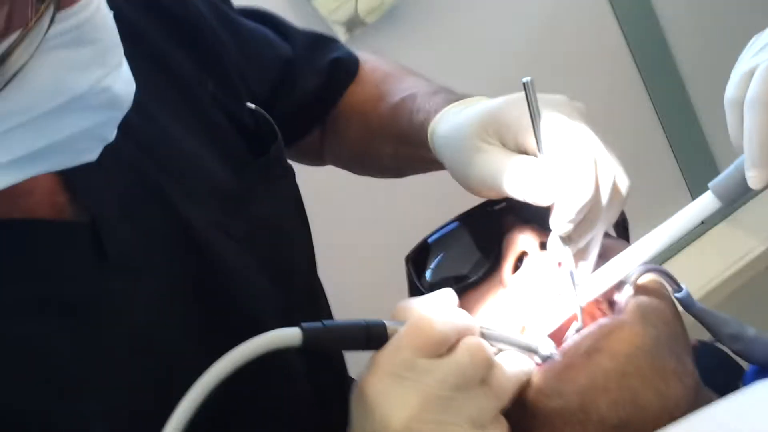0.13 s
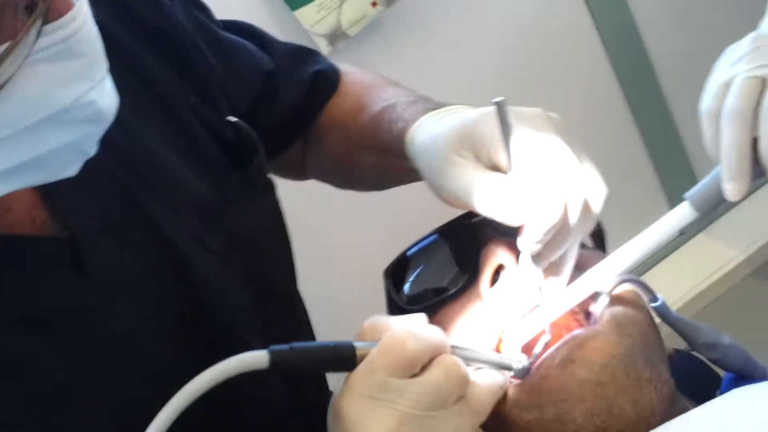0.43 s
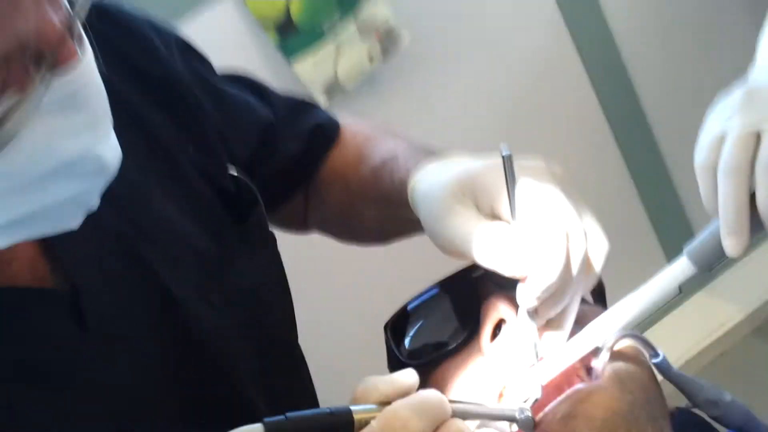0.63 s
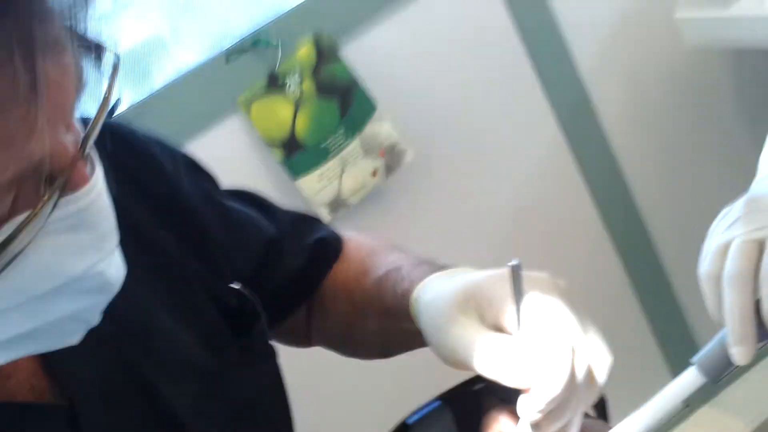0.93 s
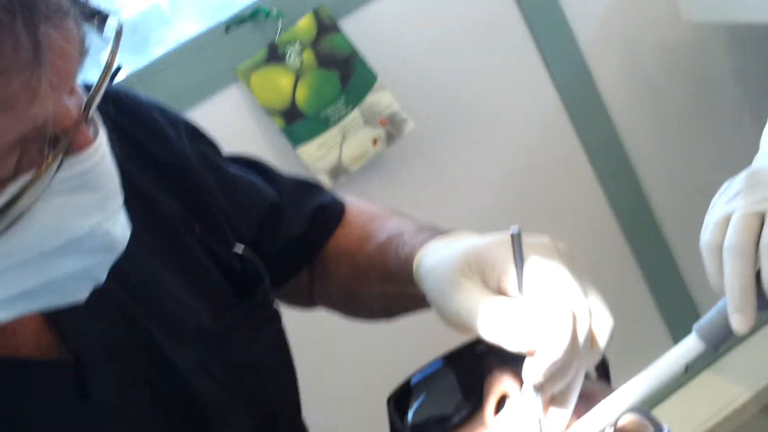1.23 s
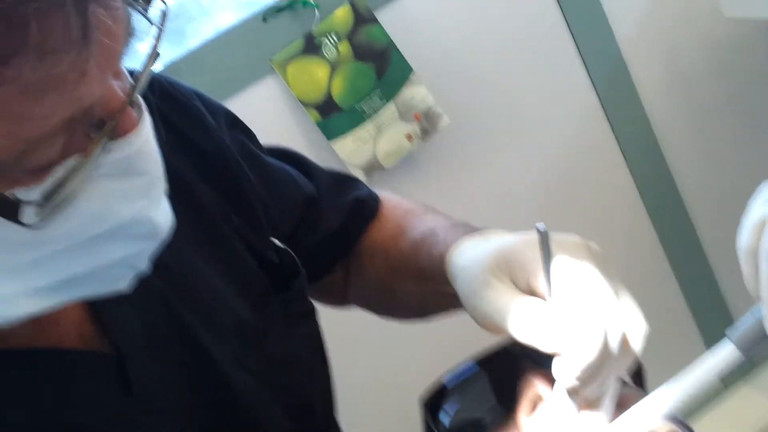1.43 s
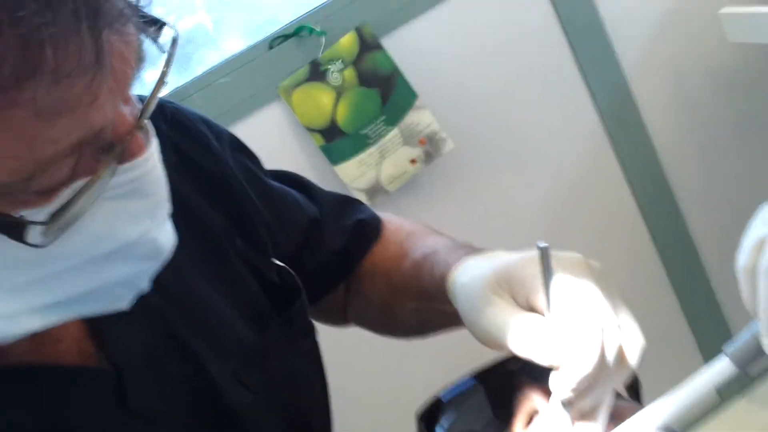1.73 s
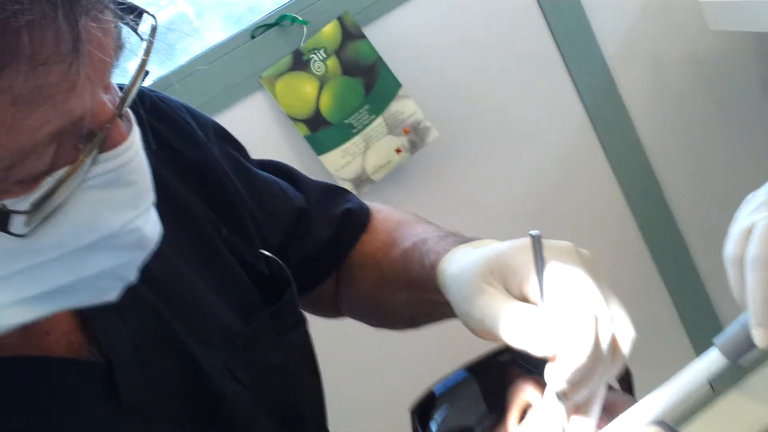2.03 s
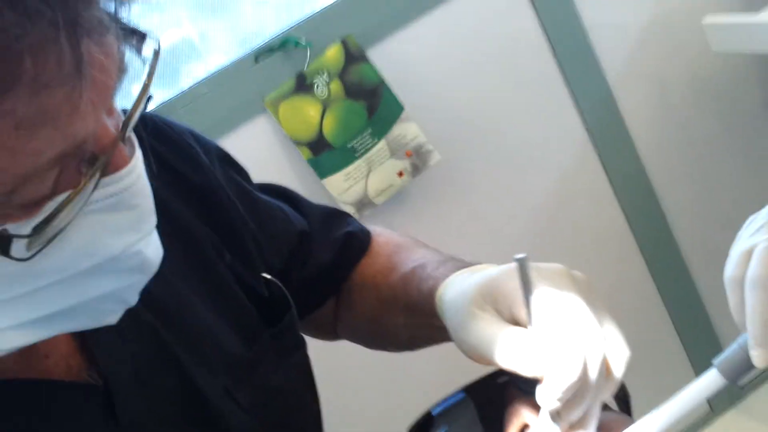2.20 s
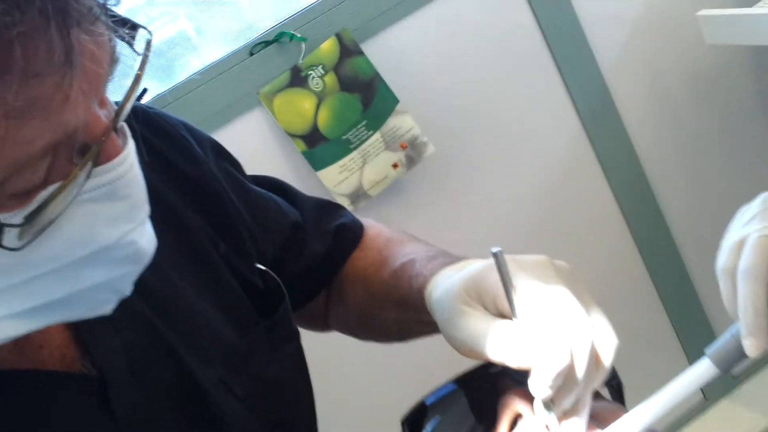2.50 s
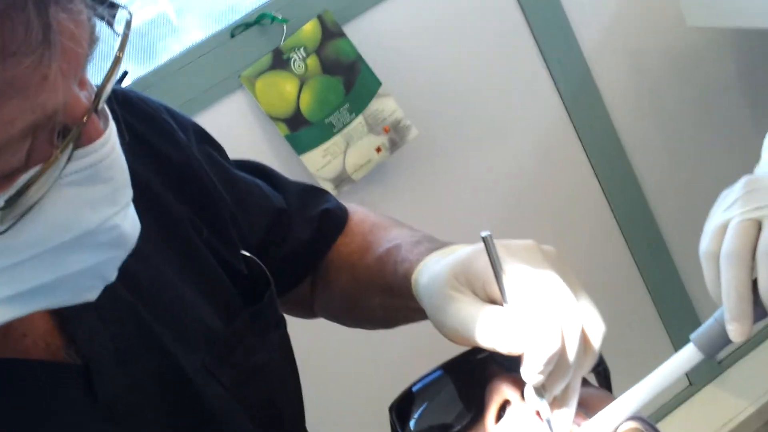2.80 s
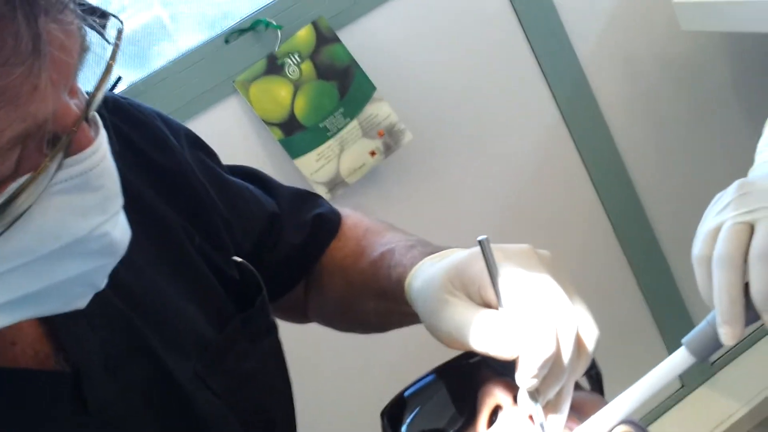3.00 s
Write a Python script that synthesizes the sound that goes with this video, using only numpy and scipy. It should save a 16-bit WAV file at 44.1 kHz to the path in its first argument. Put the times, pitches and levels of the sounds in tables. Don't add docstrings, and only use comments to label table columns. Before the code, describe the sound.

A dental handpiece whines and hisses harshly, then cuts off, leaving steady suction rush.

```python
import sys
import numpy as np
from scipy import signal
from scipy.fft import rfft, irfft, next_fast_len
from scipy.io import wavfile

SR = 44100
rng = np.random.default_rng(int(sys.argv[2]) if len(sys.argv) > 2 else 0)


def unload_wav(signal):
    wavfile.write(
        sys.argv[1],
        SR,
        np.round(np.clip(np.atleast_2d(signal).T, -1, 1) * 32767).astype(np.int16),
    )


def how_loud(loudness_db):
    steps = np.asarray(loudness_db, float) / 20
    return 10 ** steps


N = 138915


def in_time(rows):
    s, *columns = np.transpose(rows)
    return [np.interp(np.arange(N) / SR, s, column) for column in columns]


def at_hz(points, hz):
    table_hz, values = np.array(points).T[:2]
    return np.interp(np.log(hz), np.log(table_hz), values)


def drift(rate_hz):
    pole = np.exp(-80 * np.pi * rate_hz / SR)
    noise = rng.standard_normal(N // 40 + 2002)
    slow = signal.lfilter([1], [1, -2 * pole, pole * pole], noise)[2000:]
    return np.interp(np.arange(N) / 40, np.arange(len(slow)), slow / slow.std())


def turbulence(shape, pan_db, alike):
    # frequency in Hz, phase in radians.
    port_lead = [(2500, .1), (4400, .3), (6000, 1.3), (7500, 1.4), (8500, 2.4), (10500, 3.2), (14500, 3.5)]
    size = next_fast_len(N)
    hz = np.arange(size // 2 + 1) * SR / size + 1
    shared, left, right = rfft(rng.standard_normal((3, size)))
    half_lead = np.exp(.5j * at_hz(port_lead, hz))
    alike = np.clip(alike, 0, 1)
    common, own = np.sqrt(alike) * shared, np.sqrt(1 - alike)
    pair = np.array([common * half_lead + own * left, common / half_lead + own * right])
    out = irfft(pair * shape(hz), size)[:, :N]
    return out / out.std() * how_loud(np.array([[pan_db / 2], [-pan_db / 2]]))


def resonance(centre_hz, width_hz):
    return lambda hz: 1 / (1 + ((hz - centre_hz ** 2 / hz) / width_hz) ** 2)


def rings(table, slow_db, fast_db, turn):
    # frequency in Hz, change in dB.
    tip_effect = [(590, 3), (1000, 0.5), (1900, 0), (4300, 1), (6500, -1), (8000, -1.5), (10300, 3.5),
                  (13300, 4)]
    out = 0
    for centre_hz, width_hz, db, pan_db, alike in table:
        db = db + turn * at_hz(tip_effect, centre_hz)
        db = db + slow_db * drift(1.8) + fast_db * drift(17)
        out = out + how_loud(db) * turbulence(resonance(centre_hz, width_hz), pan_db, alike)
    return out


def air_jet():
    # frequency in Hz, density in dB per Hz.
    jet_colour = [(35, -55), (60, -37), (678, -28.5), (978, -17), (2230, -18.5), (4230, -8), (4960, -7),
                  (7000, -1.5), (14200, -19.5)]
    # centre in Hz, width in Hz, level in dB, left-right in dB, port likeness 0-1.
    jet_cavities = [(6240, 380, -7, 0.5, .6), (7030, 700, -11.5, -4, 0.3), (7800, 830, -9.5, -4, 0.8),
                    (4222, 310, -14.5, -2, 0.2), (3255, 630, -19, 0.5, 0.4), (994, 250, -24.5, 2, 0.3)]
    # time in seconds, cavity level in dB.
    jet_depth = [
        (0, -3),
        (.2, -5.5),
        (.35, -1),
        (.6, 3),
        (.68, 0),
        (.75, -6.5),
    ]
    depth_db, = in_time(jet_depth)
    hiss = how_loud(-0.5) * turbulence(lambda hz: how_loud(at_hz(jet_colour, hz)), -0.37, .35)
    return hiss + how_loud(depth_db) * rings(jet_cavities, slow_db=2.0, fast_db=2.0, turn=0)


def turbine_whine():
    # time in seconds, pitch in Hz, level in dB.
    whine = [
        (0, 7116, -12),
        (.12, 7115, -12),
        (.23, 7116, -12),
        (.29, 7110, -20),
        (.38, 7095, -22),
    ]
    stop_db_per_s, wobble_hz = 150, 2.6
    hz, tone_db = in_time(whine)
    tone_db = tone_db - stop_db_per_s * np.maximum(np.arange(N) / SR - whine[-1][0], 0)
    phase = 2 * np.pi * np.cumsum(hz + wobble_hz * drift(16)) / SR
    level = np.sqrt(2) * how_loud(tone_db + 2.5 + 1.5 * drift(21))
    tone = level * np.sin(phase + np.array([[.3], [-.3]]))
    return tone * how_loud(np.array([[-1.5], [1.5]]))


def handpiece():
    # time in seconds, air level in dB.
    drive_air = [
        (0, -1),
        (.25, -4),
        (.45, -3.5),
        (.65, -6),
        (.74, -6.5),
        (.775, -8.5),
        (.8, -41),
        (.85, -76),
    ]
    air_db, = in_time(drive_air)
    return how_loud(air_db) * air_jet() + turbine_whine()


def suction():
    # time in seconds, flow in dB, turn of the tip -1 to 1.
    suction_flow = [(0, -15, -0.22), (.3, -14, 0.16), (.74, -15.5, -0.55), (.81, -16.5, -0.24),
                    (1.25, -17, -0.043), (1.55, -17, 0.42), (1.75, -16.5, -0.061), (2.1, -16.5, -0.16),
                    (2.35, -17.5, 0.91), (2.62, -18, 1), (2.85, -16.5, 0.71), (3.15, -16.5, 0.34)]
    # frequency in Hz, density in dB per Hz.
    rush_colour = [(100, -44), (500, -42.5), (2350, -46.5), (3750, -21.5), (5200, -13), (7500, -2.5),
                   (9500, -9), (14500, -15)]
    # centre in Hz, width in Hz, level in dB, left-right in dB, port likeness 0-1.
    tube_rings = [(951, 190, -22.5, 1.5, .4), (1086, 130, -23, 2.5, 0.2), (1283, 130, -28, 0, 0.1),
                  (2869, 260, -29.5, 2, 0.6), (3311, 320, -20.5, 0, 0.6), (4360, 700, -13, -4, .6),
                  (6675, 700, -4, -.5, 0.7), (7570, 560, -7, -4.5, .5), (8295, 800, -2, -3, 0.83),
                  (10320, 700, -16, -2.5, 0.5), (14190, 480, -23, -3.5, .8), (1883, 20, -44.5, -17, 0),
                  (580, 20, -41.5, 2, 0.7), (728, 120, -30.5, 3.5, 0.3)]
    rush_db, makeup_db = 0.5, 5.5
    flow_db, turn = in_time(suction_flow)
    rush = turbulence(lambda hz: how_loud(at_hz(rush_colour, hz)), -2.2, 0.55)
    rush = how_loud(rush_db + 0.96 * drift(6.8)) * rush
    ringing = rings(tube_rings, slow_db=0.73, fast_db=1.15, turn=turn)
    return how_loud(flow_db + makeup_db) * (rush + ringing)


def room():
    # start in seconds, peak level in dB, pitch in Hz.
    knocks = [
        (1.492, -40, 183),
        (1.539, -42.5, 115.6),
        (1.939, -41.5, 118),
        (2.003, -43, 128),
        (2.493, -43, 386),
        (2.727, -46, 129),
    ]
    hum_hz, hum_db, knock_s, knock_db = 140, -62, 0.035, 15
    out = how_loud(hum_db + 1.2 * drift(5.2)) * turbulence(resonance(hum_hz, 150), -0.42, 0.084)
    t = np.arange(N) / SR
    for start_s, db, hz in knocks:
        age = np.maximum(t - start_s, 0) / knock_s
        swell = age * np.exp(-3 * age ** 2)
        out = out + how_loud(db + knock_db) * swell * np.sin(2 * np.pi * hz * (t - start_s))
    return out


def spectral_grain(x):
    # frequency in Hz, step in dB.
    rounding = [(2300, -9), (3100, -2), (4000, 1.5), (5500, 1.5), (8000, 0), (10000, -1.5), (14000, -2)]
    frame, frame_start, group, fine_lines = 1024, 488, 4, 104
    mute_db, mid_side_share = -15, .8
    usual_level, step_follows, scatter_db = .35, 0.28, 0.5
    n, k = np.arange(2 * frame), np.arange(frame)
    window = np.sin(np.pi * (n[:, None] + .5) / 2 / frame)
    basis = np.cos(np.pi / frame * np.outer(n + .5 + frame / 2, k + .5)) * window
    basis *= np.sqrt(2 / frame)
    pad = frame - frame_start
    blocks = np.pad(x, ((0, 0), (pad + frame, 2 * frame - (pad + N) % frame))).reshape(2, -1, frame)
    lines = np.concatenate([blocks[:, :-1], blocks[:, 1:]], axis=2) @ basis

    mid_side = rng.random((lines.shape[1], 1)) < mid_side_share

    def rotate(c):
        return np.where(mid_side, np.array([c[0] + c[1], c[0] - c[1]]) / np.sqrt(2), c)

    lines = rotate(lines)
    level = np.sqrt(np.mean(lines ** 2, axis=(0, 2)) + 1e-9)[:, None]
    groups = lines.reshape(2, -1, frame // group, group)
    group_rms = np.sqrt(np.mean(groups ** 2, axis=3))
    kept = np.repeat(group_rms > how_loud(mute_db) * level, group, axis=2)
    scatter = np.repeat(rng.standard_normal((len(level), frame // 32)), 32, axis=1)
    step = how_loud(at_hz(rounding, (k + .5) * SR / 2 / frame) + scatter_db * scatter)
    step = step * level * (level / usual_level) ** step_follows
    coarse = np.sign(lines) * np.floor(np.abs(lines / step) ** .75 + .4054) ** (4 / 3) * step
    back = rotate(np.where(k < fine_lines, lines * kept, coarse)) @ basis.T
    out = back[:, 1:, :frame] + back[:, :-1, frame:]
    return out.reshape(2, -1)[:, pad:pad + N]


def scene():
    return handpiece() + suction() + room()


def top_cut(x):
    return signal.sosfilt(signal.butter(12, 14480, fs=SR, output="sos"), x)


def record(dry):
    overloaded = np.clip(dry, -0.89, 0.89)
    mix = spectral_grain(overloaded)
    return top_cut(mix)


dry = scene()
out = record(dry)
unload_wav(out)
```